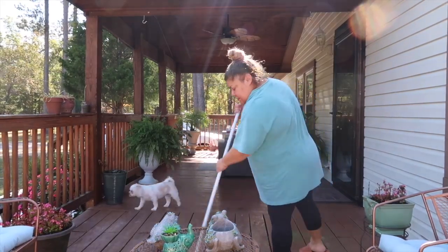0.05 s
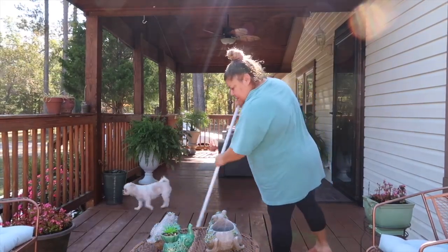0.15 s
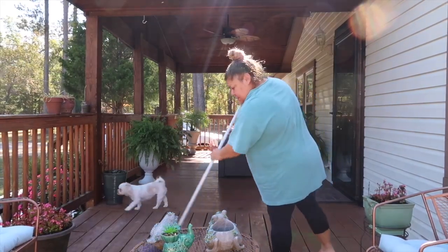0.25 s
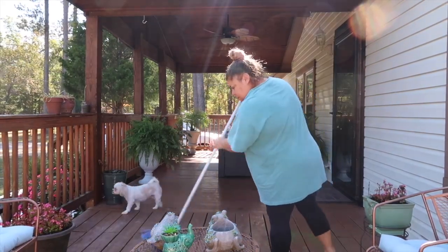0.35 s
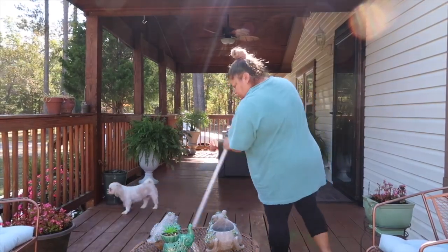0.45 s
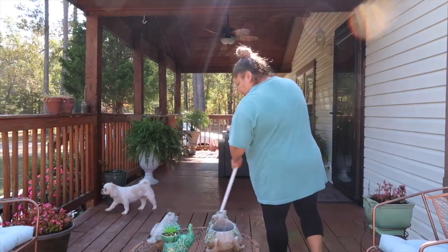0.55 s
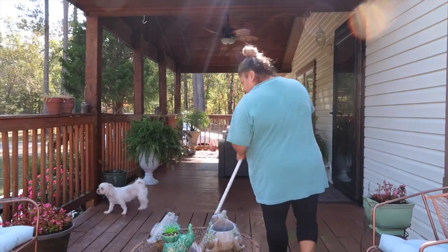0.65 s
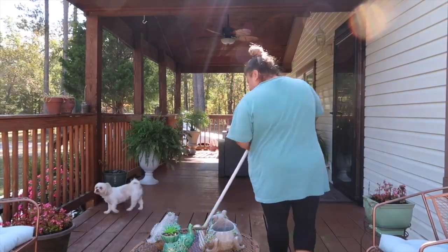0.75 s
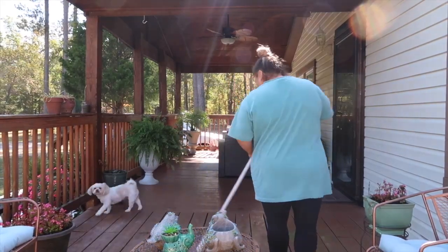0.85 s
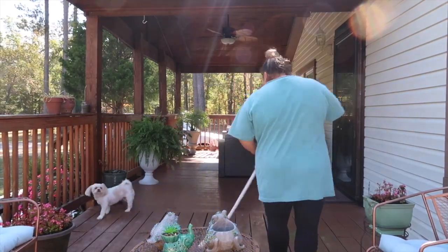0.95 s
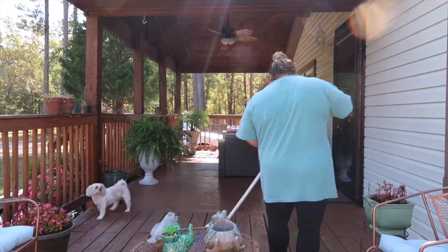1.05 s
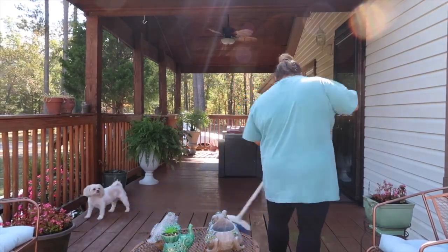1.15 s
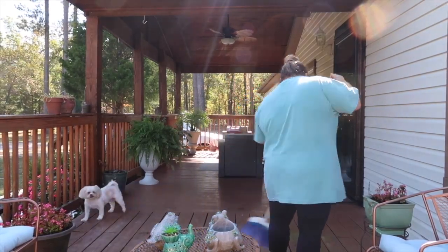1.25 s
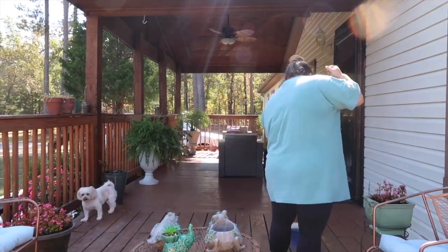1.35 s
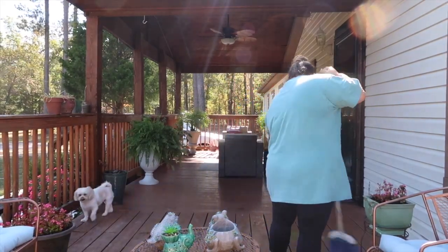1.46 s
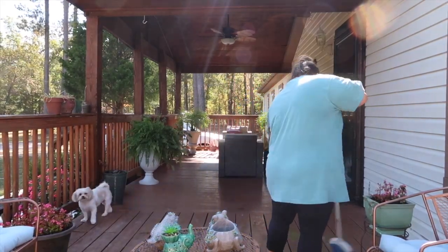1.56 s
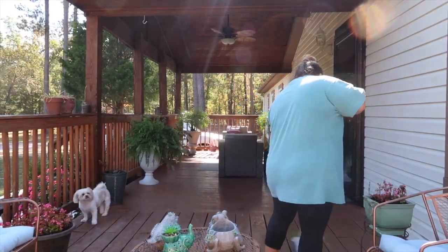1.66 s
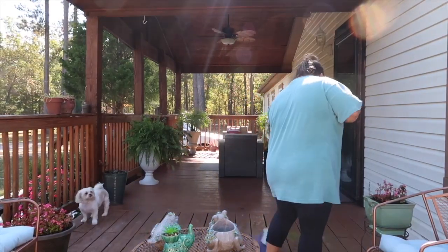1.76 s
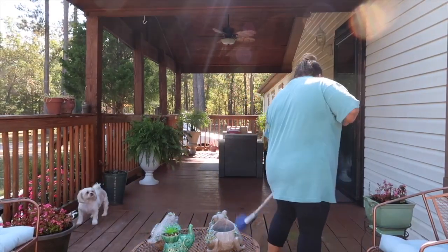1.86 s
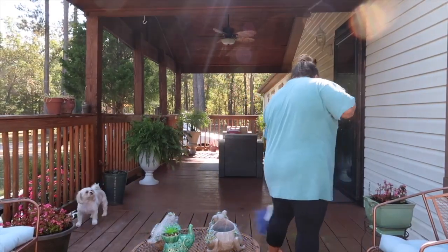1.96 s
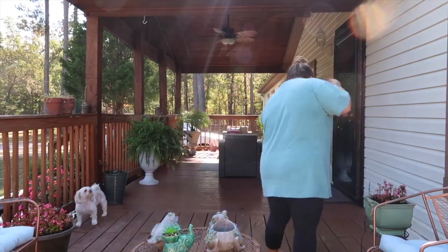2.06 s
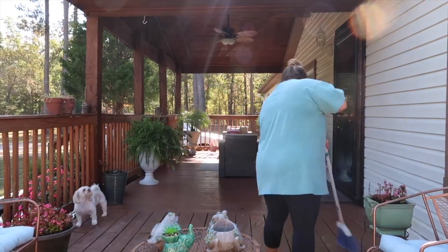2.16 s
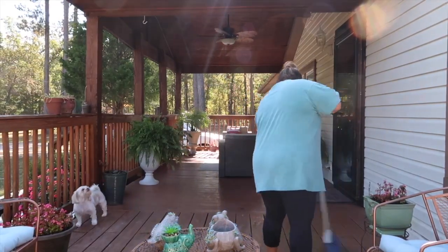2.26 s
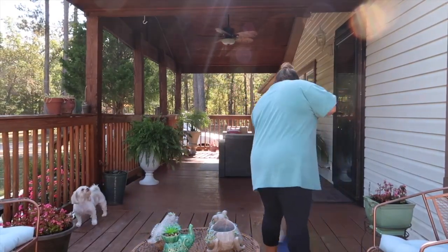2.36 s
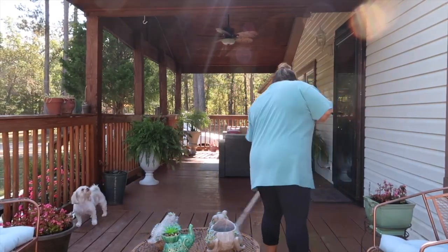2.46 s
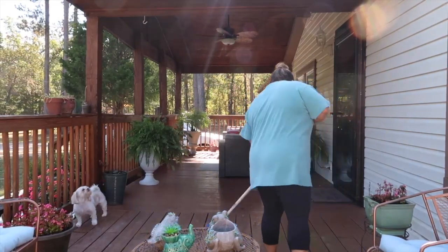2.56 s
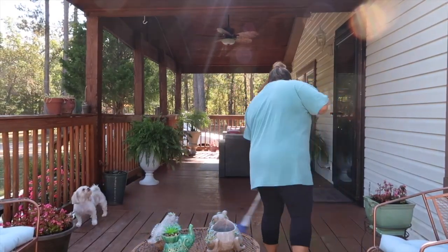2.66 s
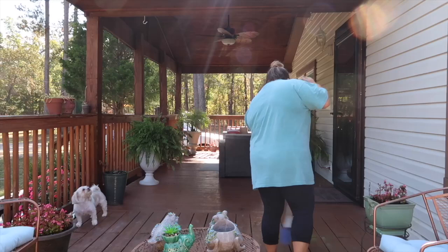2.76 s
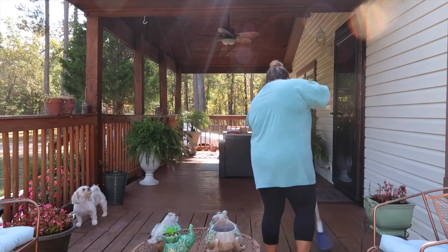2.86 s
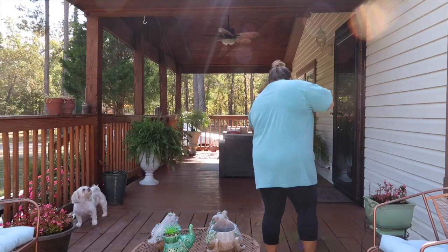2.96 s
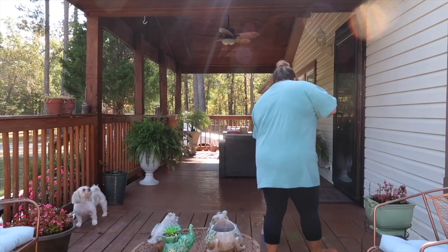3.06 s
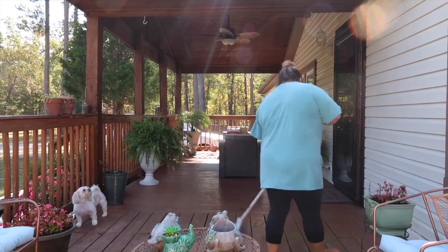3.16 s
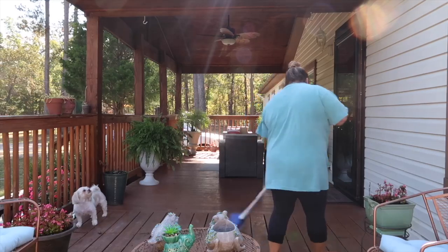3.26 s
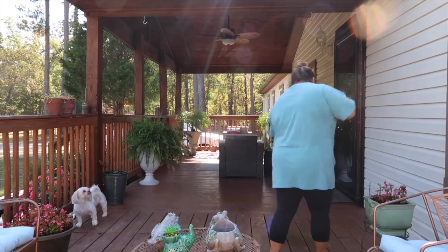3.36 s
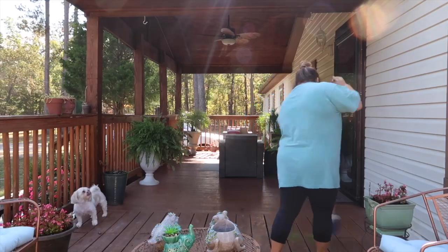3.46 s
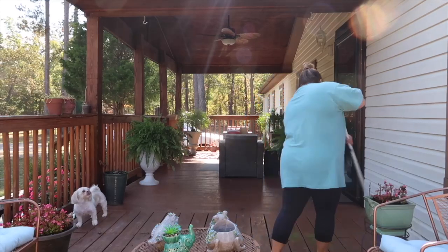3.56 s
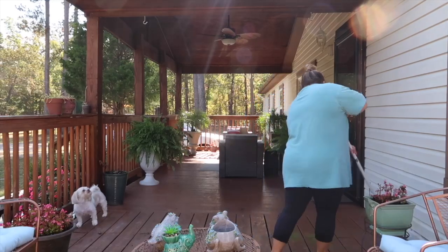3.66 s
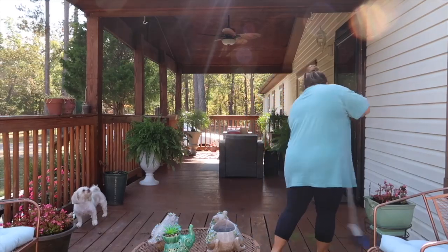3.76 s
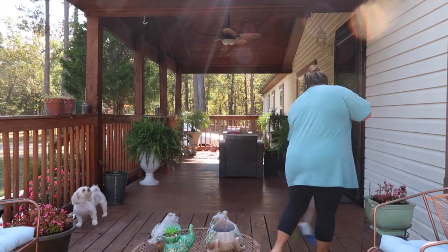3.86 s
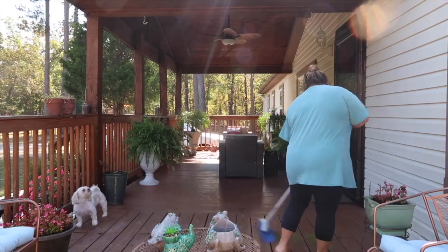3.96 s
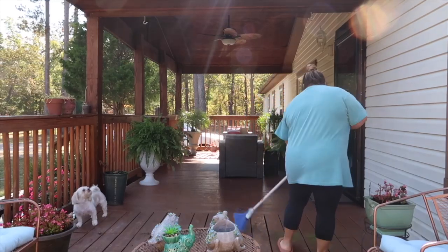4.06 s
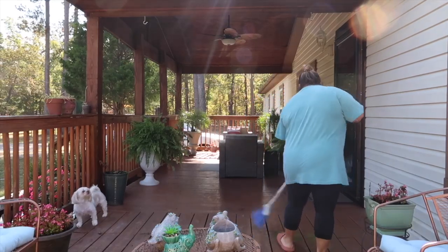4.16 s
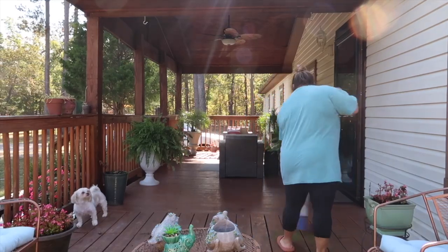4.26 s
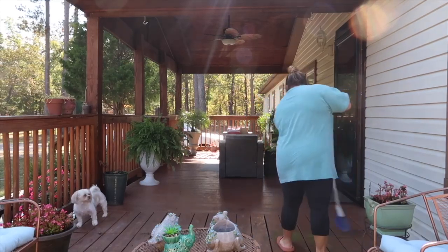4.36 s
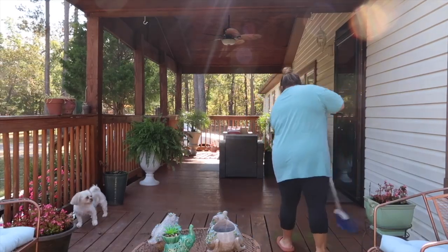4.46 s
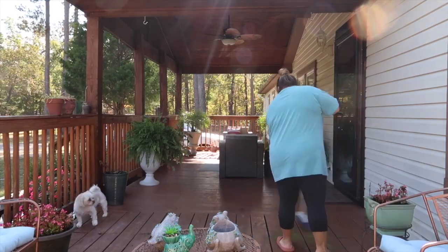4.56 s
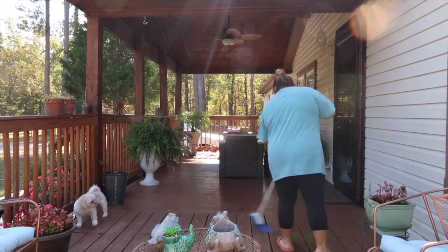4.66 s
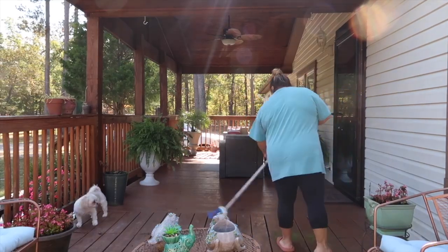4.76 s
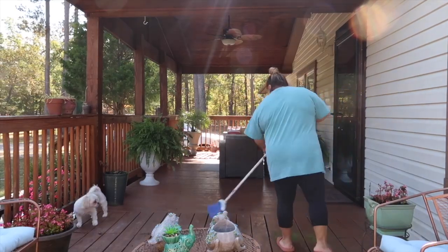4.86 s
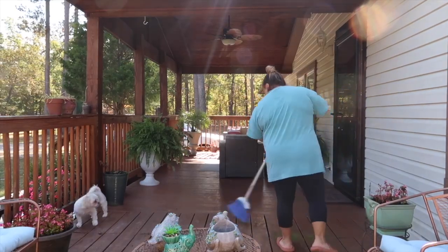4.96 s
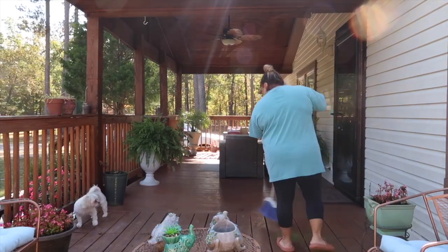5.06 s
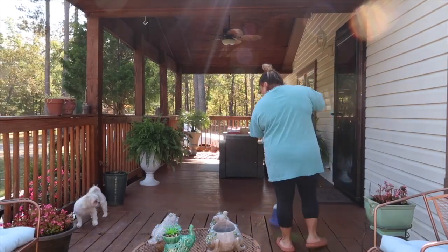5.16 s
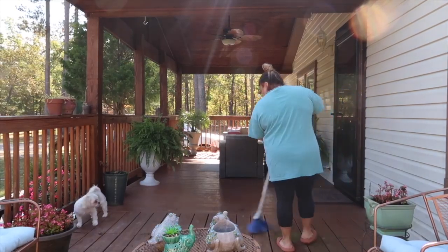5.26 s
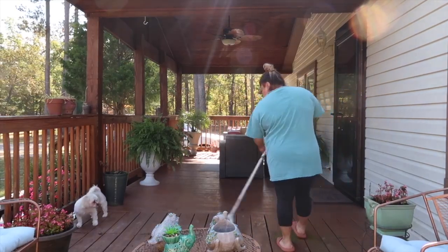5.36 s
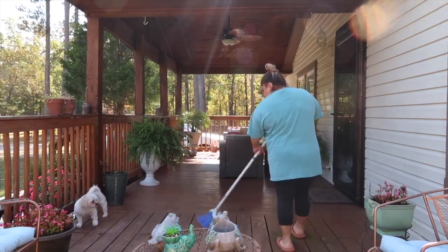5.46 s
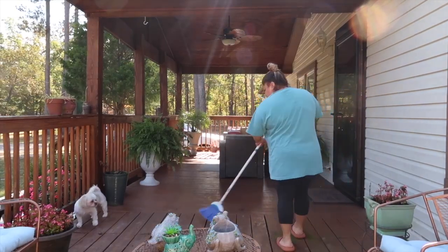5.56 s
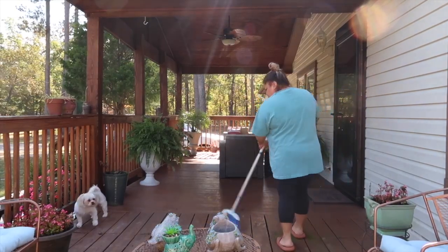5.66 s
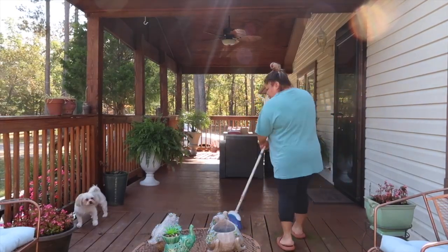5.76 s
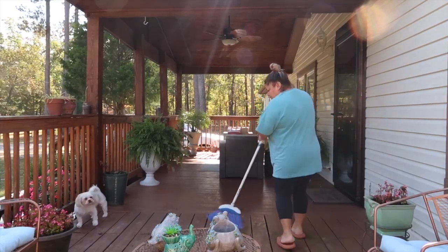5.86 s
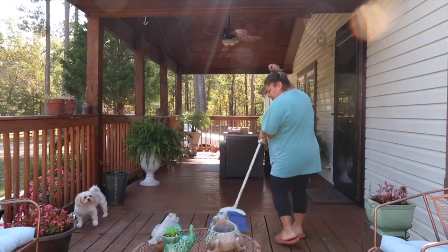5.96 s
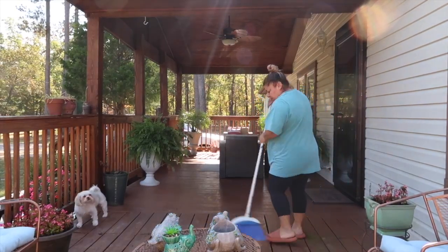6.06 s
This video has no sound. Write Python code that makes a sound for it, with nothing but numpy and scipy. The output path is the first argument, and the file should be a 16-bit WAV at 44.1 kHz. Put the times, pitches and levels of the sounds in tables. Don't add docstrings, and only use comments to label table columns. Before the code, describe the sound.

Scratchy broom strokes on a wooden deck, the head rattling and tapping, one sharp knock early on, footsteps thumping, faint outdoor rumble beneath.

```python
import sys
import numpy as np
from scipy import signal
from scipy.fft import rfft, irfft
from scipy.io import wavfile
from scipy.ndimage import uniform_filter1d

SR = 44100
rng = np.random.default_rng(int(sys.argv[2]) if len(sys.argv) > 2 else 0)


def boost(x):
    u = np.asarray(x, float) / 20
    return 10 ** u


def store_pcm(level_fs):
    pcm = np.round(np.clip(level_fs, -1, 1) * 32767).astype(np.int16)
    wavfile.write(sys.argv[1], SR, np.atleast_2d(pcm).T)


N = 268811
TIME = np.arange(N) / SR

# fastest_s, rise_s, fall_s, bristles_db, weight_on_head_db
PUSHES = [
    (0.25, 0.14, 0.22, -35.5, -8),
    (0.62, 0.068, 0.081, -40, -6.5),
    (1.78, .24, 0.17, -40, -5),
    (2.53, 0.3, 0.17, -39.5, -0.5),
    (3.22, 0.29, 0.23, -41.5, 0),
    (3.95, .22, 0.32, -41.5, 3.5),
    (4.78, 0.29, 0.22, -41, 2),
    (5.41, 0.15, .2, -38.5, 2),
]
# fastest_s, rise_s, fall_s, bristles_db, weight_on_head_db
RETURNS = [(0.79, .11, 0.35, -46, -10), (1.26, 0.19, .16, -48, -8), (1.49, .3, 0.33, -50, -17),
           (2.11, 0.17, 0.19, -48.5, -15), (2.72, 0.25, 0.15, -53, -25), (3.43, .2, 0.29, -56.5, -34),
           (4.45, .2, 0.14, -59.5, -6), (5.62, .2, 0.14, -54.5, -3), (5.81, 0.17, 0.093, -51.5, -3),
           (5.95, 0.11, .25, -60, 0)]
# fastest_s, rise_s, fall_s, bristles_db, weight_on_head_db
FLICKS = [(0.1, 0.088, 0.18, -52, -4.5), (0.66, 0.066, 0.065, -45, -15), (1.86, 0.13, 0.052, -48, -8),
          (2.58, .08, 0.072, -42, -10), (3.28, 0.055, 0.077, -51, -10), (3.86, 0.093, 0.073, -46, -14),
          (4.12, 0.14, 0.056, -47, 1), (4.9, 0.15, 0.036, -48, -4), (4.65, .06, .08, -46.5, 2.5),
          (5.3, 0.045, 0.088, -49.5, 2)]
# pitch_hz, level_db (per Hz)
BRISTLE_COLOUR = [(700, -16.5), (1300, -5), (2100, 0.5), (3200, -1), (4300, -9), (6000, -27), (9000, -36)]
# pitch_hz, level_db (per Hz)
TIP_COLOUR = [(3000, -6.5), (4500, -0.5), (7000, -1), (10000, -4.5), (12800, -2.5), (14000, -15),
              (15500, -30)]
# pitch_hz, width_hz, level_db
HEAD_RESONANCES = [(635, 215, 6.5), (922, 310, 5), (430, 690, -1.5), (1370, 240, -2)]
# pitch_hz, width_hz, level_db
BOARD_RESONANCES = [(84, 29, 0.5), (150.3, 30.3, 0.5), (180.3, 67, -2), (267, 68, -8)]
# start_s, peak_db, ring_hz, scuff_db (relative to the ring)
LANDINGS = [(0.074, -35, 1937, 0.5), (0.567, -37, 1880, 13), (0.608, -26.5, 900, -11),
            (0.742, -30.5, 1930, -4), (0.932, -26, 1874, 2), (2.278, -19.5, 1100, 0.5),
            (2.292, -32, 597, -2), (2.975, -28.5, 736, 1), (2.98, -25, 960, -15), (3.758, -27.5, 1390, -11),
            (3.896, -21.5, 580, -3), (5.111, -31, 730, -6), (5.253, -31, 1630, 1),
            (5.258, -21.5, 1030, -0.5), (5.268, -26.5, 735, 0), (5.726, -24, 607, 1), (5.73, -21, 898, 6.5),
            (5.748, -22, 707, 5.5), (5.885, -24.5, 920, -2.5), (5.962, -40, 574, 6)]
# start_s, peak_db, ring_hz, ring_t60_s
RIM_CLIPS = [(0.496, -40, 946, .07), (0.96, -38, 1080, 0.022), (1.866, -21, 768, .035),
             (2.826, -33, 780, 0.05), (2.967, -40, 557, .05), (2.988, -36, 1230, .05),
             (3.0, -43, 650, .043), (3.312, -28.5, 602, 0.042), (4.048, -22.5, 980, 0.051),
             (4.133, -24, 990, 0.045), (4.153, -20.5, 912, 0.044), (4.534, -28, 1023, 0.06),
             (4.9, -29.5, 935, .042), (4.915, -26, 613, 0.034), (4.929, -32.5, 814, 0.073),
             (5.908, -48, 1040, .05)]
# pitch_hz, level_db, t60_s
KNOCK_MODES = [(814, -3, 0.033), (968, 0, 0.026), (1444, 2.5, 0.02), (1770, -5, 0.026), (2144, -6.5, 0.03),
               (2480, -3, 0.025), (2830, -10.5, 0.031), (3180, -7, 0.019), (3790, -6, 0.0094),
               (4680, -8, 0.012), (5370, -15, .012), (1135, -8, 0.013)]
# pitch_hz, level_db, t60_s, build_up_s
WALL_MODES = [(146.5, -15, 0.23, 0.031), (280, -16.5, 0.1, 0.012), (393, -18, 0.054, 0.0063),
              (207, -16.5, 0.13, 0.032), (521, -19, 0.059, 0.004), (655, -16, 0.055, 0.0015),
              (95, -24.5, 0.23, 0.012)]
# start_s, peak_db, pitch_hz, t60_s
HEELS = [
    (3.93, -23.5, 135, 0.12),
    (3.957, -15, 171, 0.068),
    (4.601, -21, 89, 0.074),
    (5.734, -24.5, 170, 0.21),
    (6, -38.5, 66, 0.23),
    (5.73, -34.5, 45, 0.61),
    (2.285, -29.5, 88, 0.079),
]
# start_s, peak_db, pitch_hz
JOINT_TICKS = [(1.214, -17, 1310), (1.285, -22.5, 1290), (4.349, -15.5, 1350), (4.365, -22, 1164),
               (4.373, -40, 1280), (4.382, -24, 1280), (4.424, -24, 1300), (4.485, -18, 1330),
               (4.491, -22.5, 1050), (4.504, -34, 1080), (5.582, -14.5, 1360), (5.598, -39, 1300),
               (5.639, -23, 1270), (5.661, -23.5, 1280), (5.774, -18.5, 1410), (5.792, -22, 1330),
               (6.078, -22.5, 1320)]
# pitch_hz, level_db, t60_s
TICK_MODES = [(1280, 2, 0.0067), (2310, -1.5, 0.0043), (1730, -5.5, 0.0048), (3230, -10.5, .005),
              (5260, -18.5, 0.0071), (6500, -16.5, 0.0041)]
# pitch_hz, t60_s, level_db
PORCH_TAIL = [(278, 0.28, -16.5), (1060, 0.1, -15), (3200, 0.18, -14)]
# pitch_hz, level_db (per Hz)
AIR_COLOUR = [(18, -35), (30, -2), (76, 5), (162, -0.5), (464, -6.5), (556, -16), (715, -12.5), (1320, -34),
              (3150, -25.5), (5090, -36), (7000, -33.5), (9100, -31), (15400, -120)]
# pitch_hz, level_db (per Hz)
WIDE_AIR_COLOUR = [(18, -55), (30, -21), (130, -1), (220, 2), (450, 1), (550, -5.5), (1030, -10),
                   (2000, -17.5), (2800, -20.5), (7400, -32), (12500, -50), (14000, -41), (15500, -52)]
# pitch_hz, trail_radians
PORT_TRAIL = [(0, 0), (1000, .08), (3500, .3), (5200, 1.6), (7000, 2.1), (8400, 2.9), (9300, 3.1),
              (16000, 3.1)]

BROOM_PAN_DB, TICK_PAN_DB = -0.94, -4


def level(x, db):
    return x * boost(db) / np.sqrt(np.mean(x ** 2))


def colour(x, points):
    hz, db = np.transpose(points)
    log_hz = np.log(np.fft.rfftfreq(N, 1 / SR) + 1)
    gain_db = np.interp(log_hz, np.log(hz), db, right=-120)
    return irfft(rfft(x) * boost(gain_db), N)


def band(x, hz, width):
    return signal.lfilter(*signal.iirpeak(hz, hz / width, SR), x)


def walk(rate):
    hold = int(SR / rate)
    steps = np.repeat(rng.standard_normal(N // hold + 1), hold)
    smooth = uniform_filter1d(uniform_filter1d(steps, hold), hold)
    return 1.48 * smooth[:N]


def slips(rate, spread_db, hiss):
    moments = rng.random(N) < rate / SR
    size_db = spread_db * np.minimum(rng.exponential(size=N), 3.5)
    clicks = moments * rng.standard_normal(N) * boost(size_db)
    return level(clicks, 0) + hiss * rng.standard_normal(N)


def fade(t, t60):
    return np.exp(-np.log(1000) * t / t60)


def modes(table, t, stretch=1):
    total = 0
    for k, (hz, db, t60) in enumerate(table):
        total = total + (-1) ** k * boost(db) * np.sin(2 * np.pi * hz * stretch * t) * fade(t, t60)
    return total


def add(out, s, sound):
    i = int(s * SR)
    out[..., i:i + sound.shape[-1]] += sound[..., :N - i]


def pan(db):
    return boost(np.array([[db], [-db]]) / 2)


def broom():
    drag, shake, flick, drum = efforts()
    patch, grain = walk(22.09), walk(70)
    clumps_db = 0.5 * patch + 1.4 * grain
    bristles = level(colour(slips(2500, 2.0, 1.4), BRISTLE_COLOUR), -0.91) * boost(clumps_db)
    tips = level(colour(slips(4500, 1.5, 0.7), TIP_COLOUR), 2.3) * boost(0.5 * clumps_db)

    twangs = np.zeros(N)
    for hz in np.geomspace(650, 3600, num=12):
        twangs += band(band(slips(22, 3.1, 0.055), hz, 170), hz, 300)
    bristles += level(twangs, -11.0)

    octaves = [band(bristles, hz, hz) for hz in (800, 1500, 2800)]
    for k, octave in enumerate(octaves):
        patches_db = 1.34 * np.roll(patch + grain, (k + 1) * SR)
        bristles = bristles + (boost(patches_db) - 1) * octave

    rattle = slips(700, 3.5, 1.0)
    head = sum(boost(db) * band(rattle, hz, width) for hz, width, db in HEAD_RESONANCES)
    head = level(head, 0.082) * boost(2.17 * np.roll(walk(35), SR // 3))

    rumble = rng.standard_normal(N)
    boards = sum(boost(db) * band(band(rumble, hz, width), hz, 2 * width) for hz, width, db in BOARD_RESONANCES)
    boards = level(boards, -3.5)
    return (bristles * drag + tips * flick + head * shake) * pan(BROOM_PAN_DB) + boards * drum


def efforts():
    power = boost([[-63.5], [-59.5], [-66], [-51.5]]) ** 2 * np.ones(N)
    head_lead_s, tip_shift_s = 0.019, 0.014
    for table, tips_db in ((PUSHES, -8), (RETURNS, -12.5), (FLICKS, -4.5)):
        for s, rise, fall, db, weight_db in table:
            drag = swell(s, rise, fall, db)
            shake = swell(s - head_lead_s, rise, fall, db + weight_db, steep=1.55)
            flick = swell(s + tip_shift_s, rise, fall, db + tips_db)
            drum = swell(s, rise, fall, db + 1 + 1.1 * weight_db, steep=1.48)
            power += np.array([drag, shake, flick, drum]) ** 2
    return np.sqrt(power)


def swell(s, rise, fall, db, steep=1):
    x = TIME - s
    drop = np.where(x < 0, np.abs(x / rise) ** 1.9, np.abs(x / fall) ** 1.73)
    return boost(db - 20 * steep * np.minimum(drop, 10))


def taps():
    out, t = np.zeros((2, N)), TIME[:SR // 4]
    landings = [(s, db, hz, 0.041, scuff_db, -11) for s, db, hz, scuff_db in LANDINGS]
    rims = [(*row, -8, -19.5) for row in RIM_CLIPS]
    for s, db, hz, t60, scuff_db, thud_db in sorted(landings + rims):
        rough = rng.standard_normal((3, len(t)))
        tone = np.sin(2 * np.pi * hz * t) + 0.26 * np.sin(2 * np.pi * 0.733 * hz * t)
        ring = tone + 3.2 * band(rough[0], hz, 0.34 * hz)
        ring = ring * fade(t, t60) * (1 - np.exp(-(t / 0.0017) ** 2))
        scuff = 1.75 * band(band(band(rough[1], 1400, 2460), 1330, 2900), 2660, 2800)
        scuff = scuff * fade(t, 0.068) * (1 - fade(t, 0.0055))
        thud = 5.9 * band(band(rough[2], 190, 340), 220, 550)
        thud = thud * fade(t, 0.21) * (1 - fade(t, 0.052))
        touch = ring + boost(scuff_db) * scuff + boost(thud_db) * thud
        add(out, s, boost(db - 5.0) * touch * pan(BROOM_PAN_DB))
    return out


def wall_knock():
    out, t = np.zeros((2, N)), TIME[:SR // 2]
    noise = rng.standard_normal(len(t))
    rattle = boost(-10.5) * band(band(noise, 1400, 1550), 1300, 2700) * fade(t, 0.14)
    shudder = boost(-6) * band(band(noise, 324, 500), 300, 600) * fade(t, 0.22) * (1 - fade(t, 0.06))
    knock = (boost(-5) * modes(KNOCK_MODES, t) + rattle) * (1 - np.exp(-(t / 0.0015) ** 2))
    wall = np.zeros(len(t))
    for hz, db, t60, build_up in WALL_MODES:
        wall += boost(db) * np.sin(2 * np.pi * hz * t) * fade(t, t60) * (1 - np.exp(-t / build_up))
    add(out, 1.5635, boost(3) * (knock * pan(-2.5) + wall + shudder))
    return out


def heels():
    out, t = np.zeros((2, N)), TIME[:SR // 2]
    for s, db, hz, t60 in HEELS:
        thump = np.sin(2 * np.pi * hz * t) * fade(t, t60) * (1 - fade(t, 0.012))
        add(out, s, boost(db) * thump)
    return out


def joint_ticks():
    out, t = np.zeros((2, N)), TIME[:SR // 20]
    for s, db, hz in JOINT_TICKS:
        click = modes(TICK_MODES, t, hz / 1280) * (1 - np.exp(-(t / 0.00047) ** 2))
        add(out, s, boost(db - 3.0) * click * pan(TICK_PAN_DB))
    return out


def porch(x):
    t = TIME[:SR // 2]
    noise = rng.standard_normal((len(PORCH_TAIL) + 1, len(t)))
    onset = (1 - fade(t, 0.0079)) / np.sqrt(len(t))
    front = np.zeros(len(t))
    for n, (hz, t60, db) in zip(noise, PORCH_TAIL):
        front += level(band(n, hz, 1.87 * hz) * fade(t, t60), db)
    flank = level(band(band(noise[-1], 7500, 7500), 7000, 9500) * fade(t, 0.13), -6.5)
    tail = onset * (front + flank * np.array([[1], [-1]]))
    return signal.fftconvolve(x[None], tail, axes=1)[:, :N]


def ports(x):
    trail = np.interp(np.fft.rfftfreq(N, 1 / SR), *np.transpose(PORT_TRAIL))
    turn = np.exp(-0.5j * trail * np.array([[1], [-1]]))
    return irfft(rfft(x) * turn, N)


def outdoors():
    mid = level(colour(rng.standard_normal(N), AIR_COLOUR), -48.5) * boost(0.69 * walk(1.9))
    side = level(colour(rng.standard_normal(N), WIDE_AIR_COLOUR), -48.5)
    return mid + side * np.array([[1], [-1]])


def scene():
    strokes, joint = broom(), joint_ticks()
    struck = taps() + wall_knock() + heels()
    into_porch = (struck + 0.5 * strokes + 0.67 * joint).mean(axis=0)
    return ports(strokes + struck + joint + porch(into_porch)) + outdoors()


def band_limit(x):
    return signal.sosfilt(signal.butter(12, 15100, fs=SR, output="sos"), x)


def record(dry):
    mid, side = (dry[0] + dry[1]) / 2, (dry[0] - dry[1]) / 2
    dull = signal.sosfiltfilt(signal.butter(7, 8500, fs=SR, output="sos"), mid)
    mid = dull + 0.18 * (mid - dull)
    both = mid + side * np.array([[1], [-1]])
    rounded = np.clip(1.08 * np.tanh(both), -1, 1)
    return band_limit(rounded * (TIME < 6.094))


dry = scene()
out = record(dry)
store_pcm(out)
```